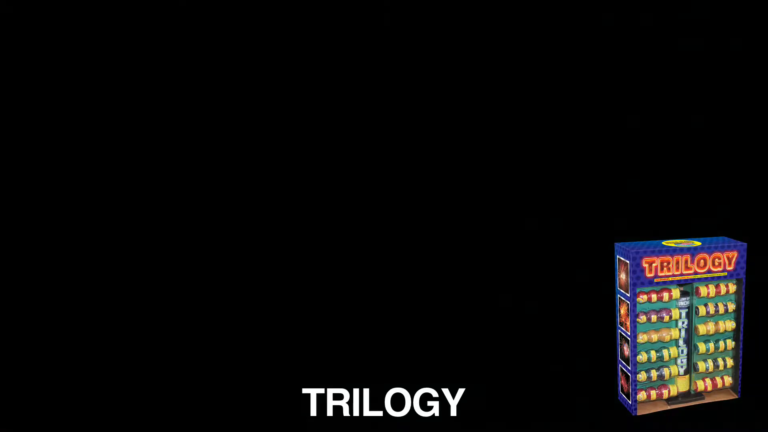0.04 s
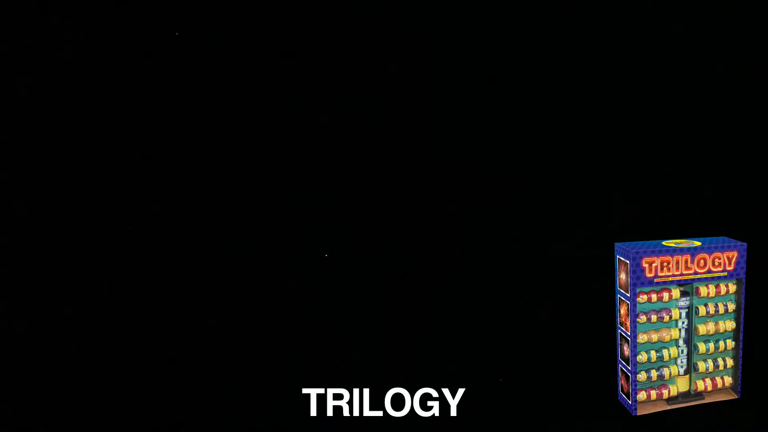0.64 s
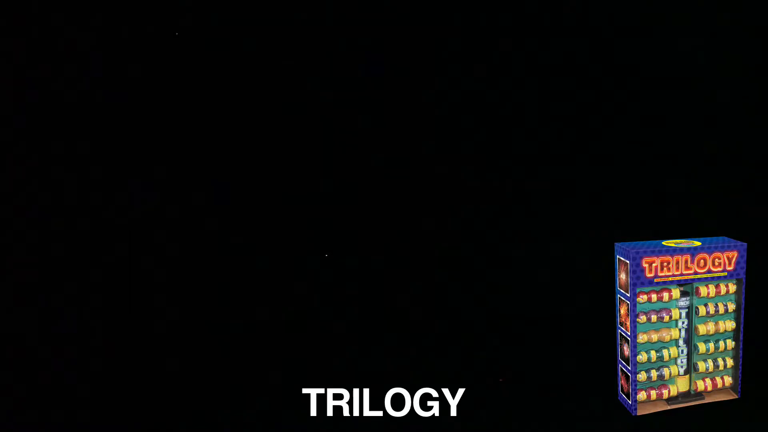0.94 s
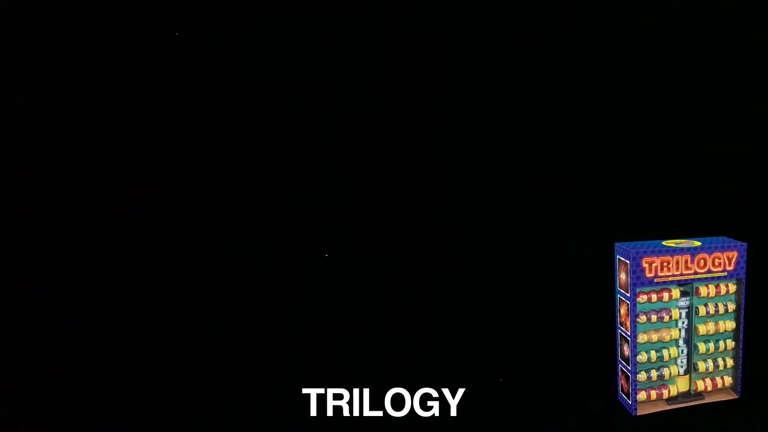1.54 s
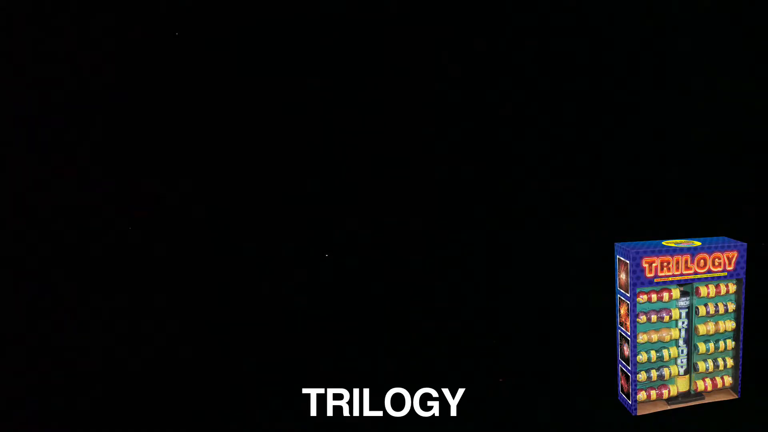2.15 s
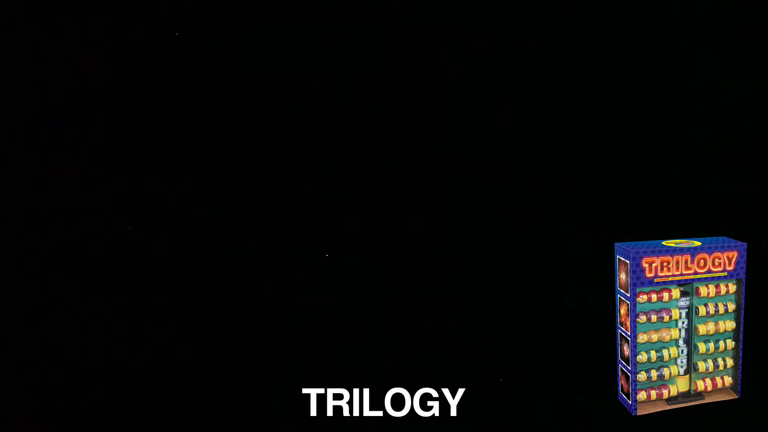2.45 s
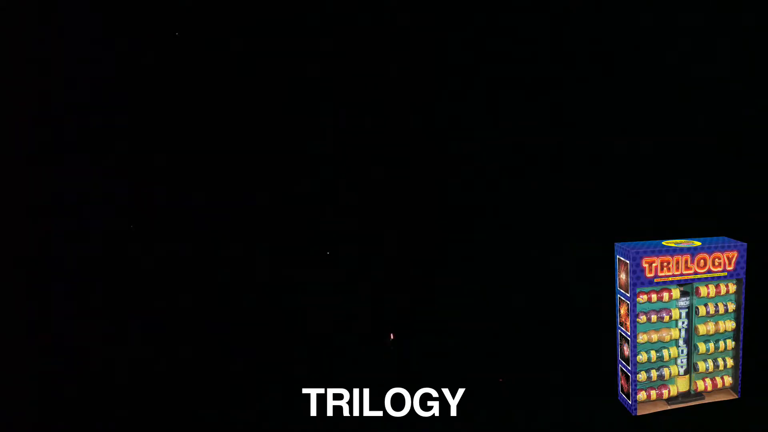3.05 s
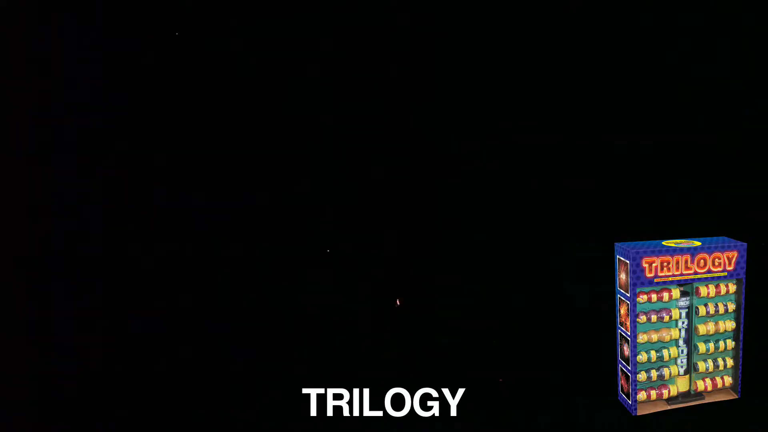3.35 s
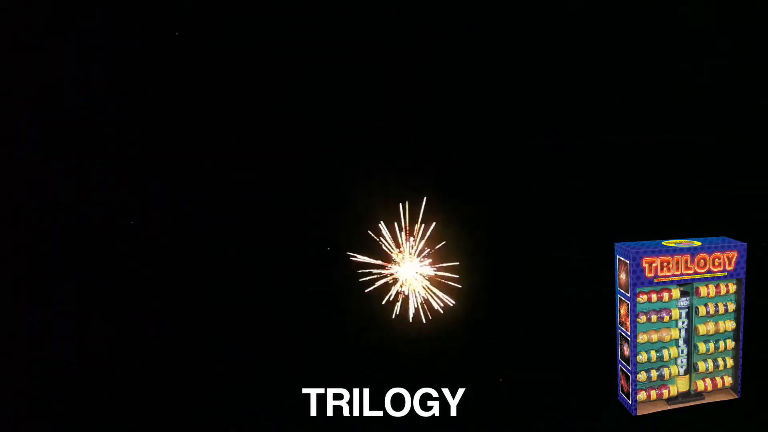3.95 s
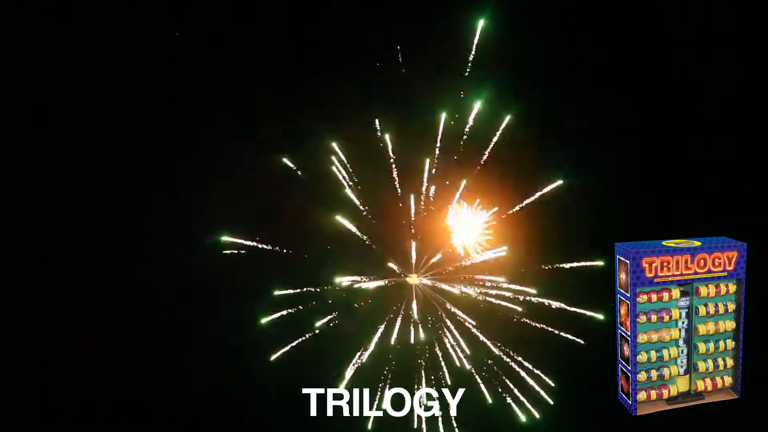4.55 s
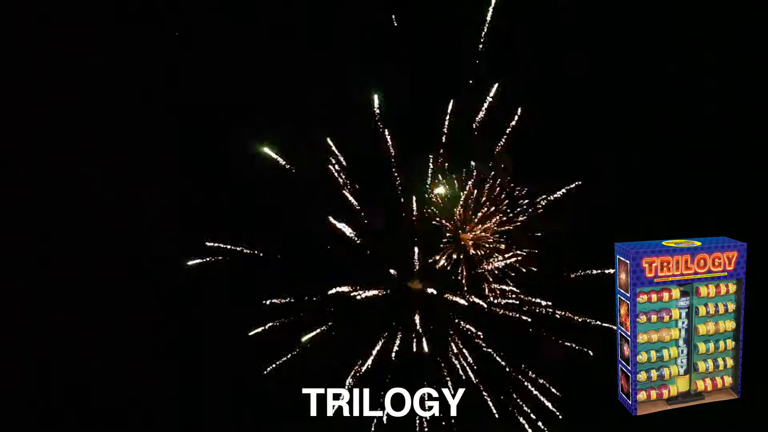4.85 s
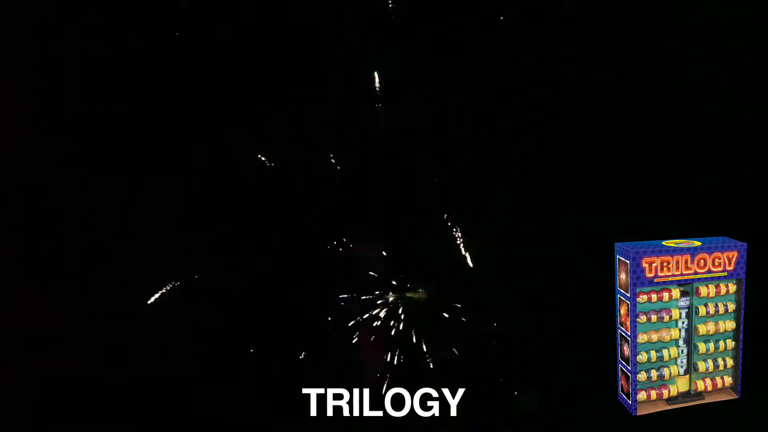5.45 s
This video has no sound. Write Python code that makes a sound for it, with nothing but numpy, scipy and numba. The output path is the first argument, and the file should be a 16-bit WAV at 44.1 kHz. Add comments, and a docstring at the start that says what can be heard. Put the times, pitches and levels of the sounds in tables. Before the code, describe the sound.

A firework shell leaves a close mortar with a punchy thump and a brief hollow ring, breaking the quiet rumble of a night field. A faint fizz follows as it climbs. Then three sharp blasts crack overhead, the first the deepest, each trailing a rolling echo over the countryside. The small microphone clips on the bangs, and its background hiss dips and slowly returns.

```python
"""Open country at night, on a camera microphone: low rumble, a faint drone, hiss, a far boom dying away
and now and then a soft knock. At 2 s a nearby mortar fires a firework shell with a thump and a rush of gas.
Its fuse fizzes overhead, and from 4 s it bursts three times. Each blast arrives with its ground bounce,
scatters off things close by and rolls away in a long hissing echo. The camera overloads on every bang;
its gain control ducks hiss and rumble and slowly lets them back."""
import sys
import numpy as np
from scipy import signal
from scipy.fft import rfft, irfft
from scipy.io import wavfile
from numba import njit

SR = 44100
rng = np.random.default_rng(int(sys.argv[2]) if len(sys.argv) > 2 else 0)


def int16_out(signal):
    """Quantize to a 16-bit WAV file."""
    q = np.round(np.clip(np.atleast_2d(signal).T, -1, 1) * 32767)
    wavfile.write(sys.argv[1], SR, q.astype(np.int16))


N = 242550
T = np.arange(N) / SR
FREQS = np.fft.rfftfreq(N, 1 / SR)


def undb(db):
    """Decibels to gain."""
    return 10 ** (np.asarray(db) / 20)

def read(rows, hz, column=1):
    """One column of a table over log frequency."""
    rows = np.array(rows, float)
    return np.interp(np.log(hz + 1e-3), np.log(rows[:, 0]), rows[:, column])

def highpass(x, hz, order):
    """Butterworth low cut."""
    return signal.sosfilt(signal.butter(order, hz, "high", fs=SR, output="sos"), x)

def noise(rows):
    """Noise from rows of f/Hz, density/dB."""
    return irfft(rfft(rng.standard_normal(N)) * undb(read(rows, FREQS)), N) * np.sqrt(SR / 2)

def noise_band(hz, skirt_db):
    """Noise peaking at hz, at skirt_db a factor of three to either side; rms 1."""
    band = noise([(hz / 10, 2 * skirt_db), (hz / 3, skirt_db), (hz, 0),
                  (hz * 3, skirt_db), (hz * 10, 2 * skirt_db)])
    return band / band.std()

def walk(rate_hz, t=T):
    """A random wander with spread near 1."""
    return np.interp(t * rate_hz, np.arange(4096), rng.standard_normal(4096))

def fade(start, t60, t=T):
    """Exponential decay from a moment on."""
    return (t >= start) * np.exp(-np.log(1000) * np.maximum(t - start, 0) / t60)

def swell(centre_s, width_s):
    """A bell-shaped rise and fall."""
    return np.exp(-((T - centre_s) / width_s) ** 2)

def add(out, s, sound):
    """Mix a sound in at a moment."""
    i = int(s * SR)
    out[i:i + len(sound)] += sound[:max(len(out) - i, 0)]

def modes(rows, start):
    """Decaying sines struck at a moment."""
    return sum(undb(db) * fade(start, t60) * np.sin(2 * np.pi * hz * (T - start))
               for hz, db, t60 in rows)

def echoes(rows, hits):
    """Countless reflections of hits (t/s, level/dB); each half octave dies at its own rate, in patches."""
    spectrum = rfft(noise(rows))
    coarse = T[::16]
    out = np.zeros(N)
    for low_hz in 22 * np.sqrt(2) ** np.arange(19):
        band = irfft(spectrum * (FREQS >= low_hz) * (FREQS < low_hz * np.sqrt(2)), N)
        t60 = read(rows, low_hz * 2 ** .25, column=2)
        power = sum((undb(db) * fade(s, t60, coarse)) ** 2 for s, db in hits)
        patches = undb(walk(25, coarse))
        out += band * np.interp(T, coarse, np.sqrt(power) * patches)
    return out


# low rumble of the open air: f/Hz, density/dB
RUMBLE_COLOUR = [(15, -92.5), (30, -75), (46, -65.5), (65, -66.5), (92, -66.5), (112, -87.5), (220, -91),
                 (400, -97), (1000, -104), (3000, -115)]
def rumble(level_db=-1, gust_db=7.5, flutter_db=2.5):
    """The air rumbles unevenly around the microphone, with one slow gust."""
    gust = gust_db * swell(3.22, .28)
    return noise(RUMBLE_COLOUR) * undb(level_db + gust + flutter_db * walk(6.6))

# faint drone in the background: f/Hz, density/dB
DRONE_COLOUR = [(120, -120), (230, -92.5), (290, -82.5), (400, -93), (700, -120)]
def drone(level_db=1.5, hold_s=1.9, fall_db_per_s=14, waver_db=2.5):
    """A low wavering drone holds, then fades away."""
    fall_db = fall_db_per_s * np.maximum(T - hold_s, 0)
    return noise(DRONE_COLOUR) * undb(level_db - fall_db + waver_db * walk(8))

# the microphone's own noise: f/Hz, density/dB, t60 none
HISS = [(100, -92), (500, -92), (1500, -94.5), (5000, -97.5), (15000, -99)]
def hiss():
    """The microphone hisses steadily."""
    return noise(HISS)

# a boom far off in the country: f/Hz, density/dB, t60/s
FAR_BOOM = [(60, -83, 0.65), (151.3, -81, 1), (450, -75, 1.3), (960, -78, 1.15), (1800, -96, 0.58),
            (5000, -115, 0.44)]
def far_boom():
    """The echo of a distant boom dies away at the start."""
    return echoes(FAR_BOOM, [(.0013, 0)])

# small knocks and scuffs: t/s, level/dB, f/Hz, width/s, skirts/dB
KNOCKS = [(0.116, -37, 71, 0.014, -40), (.44, -53, 3100, .02, -10), (2.337, -33.5, 60, 0.029, -42),
          (3.191, -50.5, 191, 0.022, -30), (3.374, -51, 219, 0.013, -34), (3.995, -39.5, 69, 0.026, -45),
          (4.449, -18, 83, .025, -39.5), (5.33, -34.5, 228, 0.02, -25)]
def knocks():
    """Soft, short bumps of noise."""
    return sum(undb(db) * swell(s, width) * noise_band(hz, skirt_db)
               for s, db, hz, width, skirt_db in KNOCKS)

LAUNCH_S = 1.9884
# the tube's air thumps as the charge lights and as the shell leaves: t/s, level/dB, f/Hz, width/s
TUBE_THUMPS = [(1.9925, 2.5, 369.7, .0024), (2.006, 18, 140, .006)]
# gas leaving the muzzle: f/Hz, density/dB
MUZZLE_GAS = [(30, -22), (120, -11), (220, -21), (400, -12), (600, -14), (780, -36), (1700, -24.5),
              (3000, -13), (5000, -25.5), (5800, -37.5), (7200, -32.5), (10000, -50.5), (16000, -62)]
# the mortar ringing on: f/Hz, level/dB, t60/s
MORTAR_MODES = [(164, -19, .22), (266, -14, .42), (350, 0, .075), (468, -26, .2), (560, -4, .08)]
# scatter off things near the microphone, for launch and bursts: f/Hz, density/dB, t60/s
NEAR_SCATTER = [(30.3, -42, 0.13), (101, -13, 0.11), (200, -6, 0.17), (380, -2.5, 0.17), (830, -6, 0.09),
                (1630, -16, 0.12), (3000, -20.5, 0.09), (5680, -16.5, 0.062), (8850, -28, 0.066),
                (15000, -38, .06)]
# the launch coming back from across the field: f/Hz, density/dB, t60/s
FIELD_ECHO = [(40, -62, 1.8), (199, -57, 1.3), (453, -56, 0.45), (699, -71, 1.2), (1300, -76, 2.8),
              (2500, -74, 2.6), (4500, -81, 2.4), (7005, -84, 0.98), (15000, -105, .5)]
def launch(leak_db=-37, spray_db=-24, spray_t60=.075, scatter_db=-30):
    """Close by, gas leaks past the shell, rushes out with a thump and trails off; the mortar rings."""
    peak_s = LAUNCH_S + .0132
    thump = sum(undb(db) * swell(s, width) * np.cos(2 * np.pi * hz * (T - s))
                for s, db, hz, width in TUBE_THUMPS)
    leak = undb(leak_db) * (T >= LAUNCH_S) * (T < peak_s)
    rush = swell(peak_s, width_s=.0047)
    spray = undb(spray_db) * fade(peak_s, spray_t60)
    gas = noise(MUZZLE_GAS) * (leak + rush + spray)
    near = echoes(NEAR_SCATTER, [(peak_s, scatter_db)])
    far = echoes(FIELD_ECHO, [(peak_s, 0)])
    return thump + gas + modes(MORTAR_MODES, peak_s) + near + far

# the fuse burning overhead: f/Hz, density/dB
FUSE_COLOUR = [(200, -108), (800, -93.5), (1500, -90.5), (2500, -91.5), (4400, -89), (5600, -101),
               (6800, -99), (9000, -108), (16000, -120)]
def fuse(rise_s=.6, fizz_db=-1, sputter_db=1, spit_db=-56.5, sparks_db=4):
    """The time fuse fizzes as the shell climbs, spits sparks for a moment and ends at the first burst."""
    first_burst_s = BURSTS[0][0]
    burning = np.clip((T - LAUNCH_S) / rise_s, 0, 1) ** 2 * (T < first_burst_s)
    fizz = undb(fizz_db + sputter_db * walk(40)) * noise(FUSE_COLOUR)
    sparks = undb(spit_db + sparks_db * walk(120)) * noise_band(hz=1480, skirt_db=-20)
    return burning * (fizz + swell(3.23, .27) * sparks)

def blast(length_ms, front_ms):
    """A shock front rounded by the air on its way down, falling overpressure and a shallow suction."""
    ms = np.arange(SR // 8) * 1e3 / SR
    return (1 - np.exp(-ms / front_ms)) * (1 - ms / length_ms) * np.exp(-ms / length_ms)

# bursts overhead: t/s, blast/dB, overpressure/ms, slap/dB, boom/dB, ring/dB, scatter/dB, echo/dB
BURSTS = [(4.0553, 42.5, 3.82, -1, 43, 35.5, 7.5, 10), (4.6993, 45.5, 1.6, -5.5, 10, 24.5, -1, 1.5),
          (5.3877, 45.5, 1.4, -7.5, 10, 22.5, -4, -4)]
# a short hollow ring beside the microphone, set off by each blast: f/Hz, level/dB, t60/s
HOLLOW_RING = [(203, 0, .075), (365, 2, .048)]
# echo rolling far over the country: f/Hz, density/dB, t60/s
COUNTRY_ECHO = [(30, -59, 3.4), (104, -46.5, 1.9), (191, -37, 1.55), (340, -29.5, 0.92), (600, -42.5, 1.69),
                (1070, -42.5, 2.9), (1970, -45.5, 3.1), (3580, -49, 2.1), (5140, -50.5, 1.82),
                (6850, -57.5, 1.31), (10100, -70, 1.13), (15000, -77, 0.93)]
def bursts(bounce_s=.0045, bounce_db=-2, slap_spread=5, slap_fall_db=7):
    """Each burst comes straight down, off the ground and off things close by, then rings and echoes."""
    shocks, boom, ring = np.zeros((3, N))
    for s, db, length_ms, slap_db, boom_db, ring_db, _, _ in BURSTS:
        wave = undb(db) * blast(length_ms, front_ms=.1)
        add(shocks, s, wave)
        add(shocks, s + bounce_s, undb(bounce_db) * wave)
        # later slaps are weaker; a bigger shell spreads them over a longer time
        for late in np.linspace(.4, 1, 6) + rng.uniform(-.06, .06, size=6):
            slap_ms = late * slap_spread * length_ms
            add(shocks, s + slap_ms / 1e3, undb(slap_db - slap_fall_db * (late - .5)) * wave)
        add(boom, s, undb(boom_db) * blast(length_ms=4, front_ms=1))
        ring -= undb(ring_db) * modes(HOLLOW_RING, s)
    # a small microphone cannot hold the pressure step and swings back and forth after it
    direct = highpass(shocks, hz=180, order=4) + highpass(boom + ring, hz=90, order=2)
    near = echoes(NEAR_SCATTER, [(s, scatter_db) for s, *_, scatter_db, _ in BURSTS])
    far = echoes(COUNTRY_ECHO, [(s, echo_db) for s, *_, echo_db in BURSTS])
    return direct + near + far


def scene():
    """Pressure at one microphone in the field, near the mortar."""
    firework = launch() + fuse() + bursts()
    background = knocks() + rumble() + drone() + far_boom() + hiss()
    return (background + firework)[None]

@njit
def follow(x, level, attack_s, release_s):
    """A level detector that charges quickly and drains slowly."""
    attack, release = 1 / (attack_s * SR), 1 / (release_s * SR)
    out = np.empty(len(x))
    for i in range(len(x)):
        level += (x[i] - level) * attack if x[i] > level else -level * release
        out[i] = level
    return out

def record(dry, threshold=.033, overload_db=29, knee_db=-10.5, top_hz=15800):
    """The camera's gain control listens to the treble; too slow for shock fronts, it lets them clip."""
    treble = highpass(dry[0], hz=2000, order=2)
    excess = np.clip(np.abs(treble) - threshold, 0, undb(overload_db))
    held = follow(excess, level=.2, attack_s=.0014, release_s=.46)
    ducked = dry / (1 + held / undb(knee_db))
    high_cut = signal.ellip(8, .02, 50, top_hz, fs=SR, output="sos")
    return signal.sosfiltfilt(high_cut, np.clip(ducked, -1, 1))


dry = scene()
out = record(dry)
int16_out(out)
```